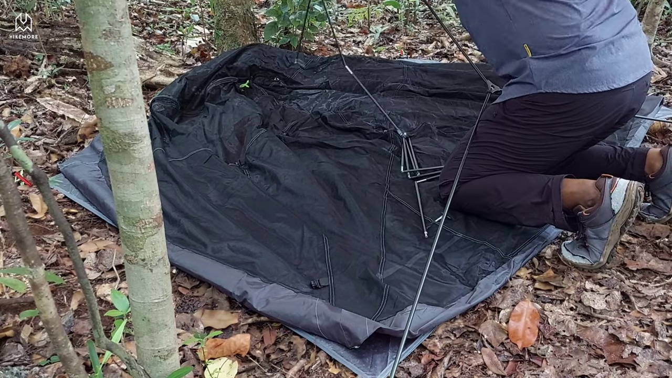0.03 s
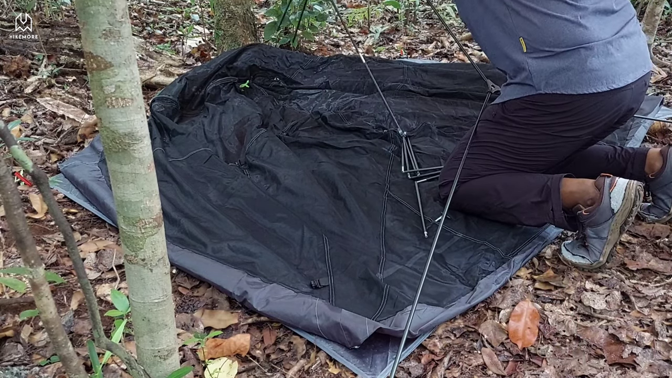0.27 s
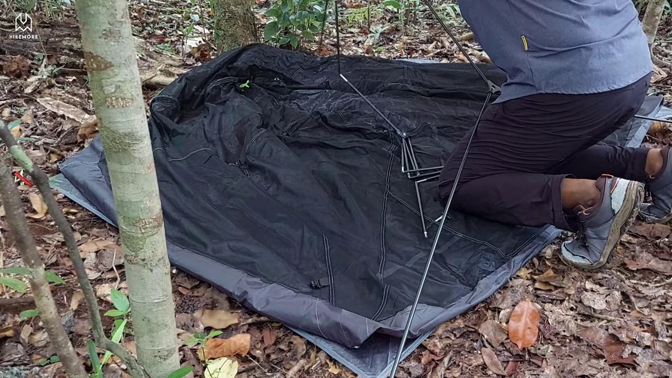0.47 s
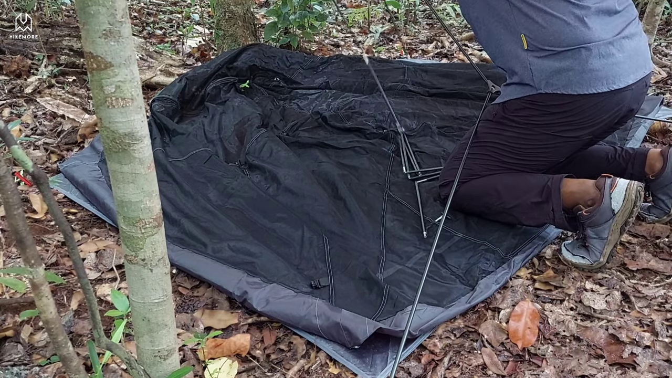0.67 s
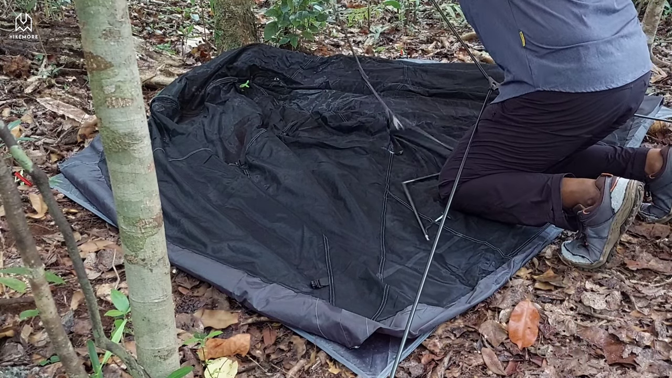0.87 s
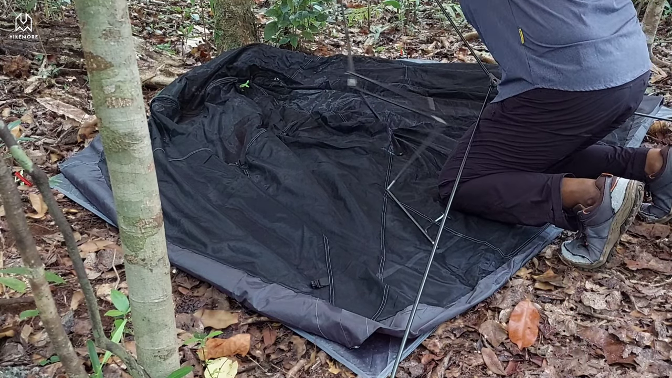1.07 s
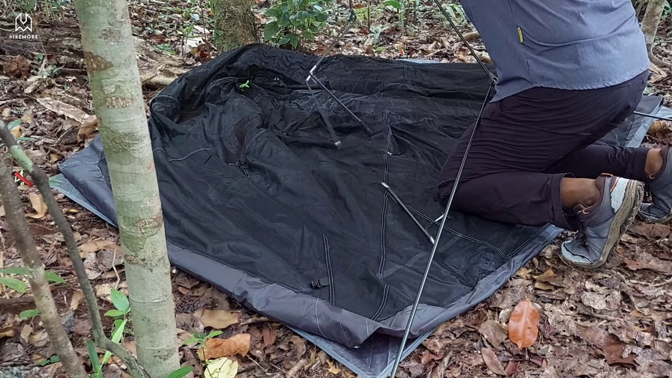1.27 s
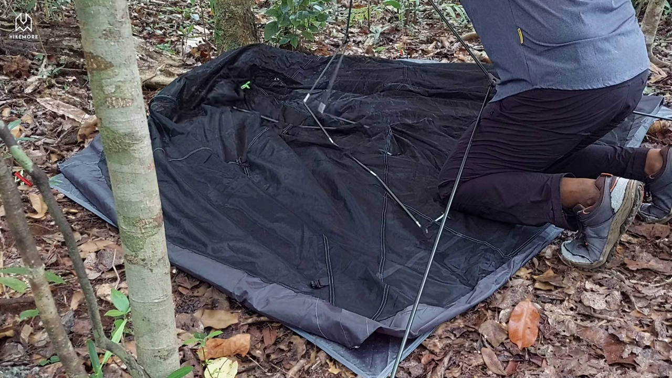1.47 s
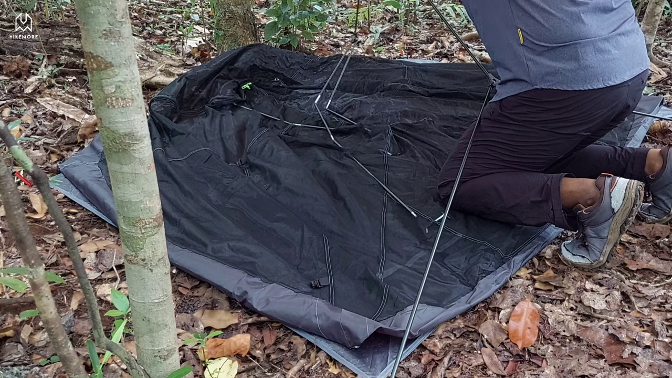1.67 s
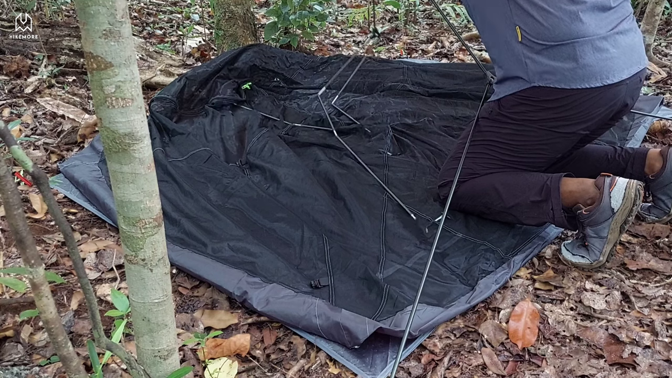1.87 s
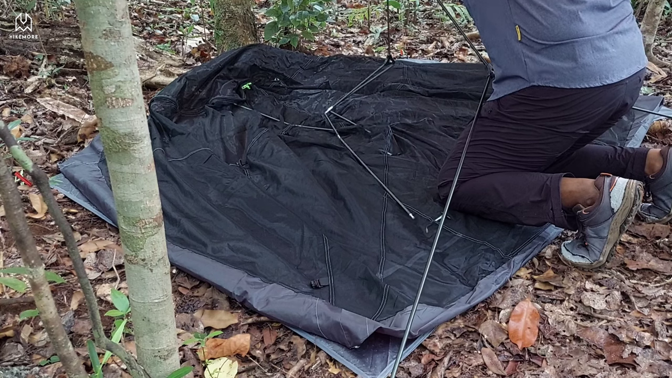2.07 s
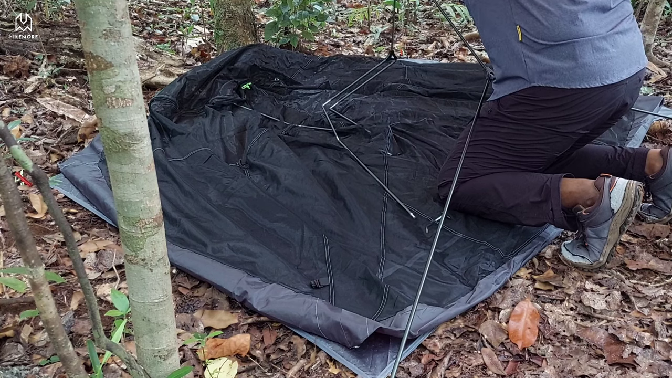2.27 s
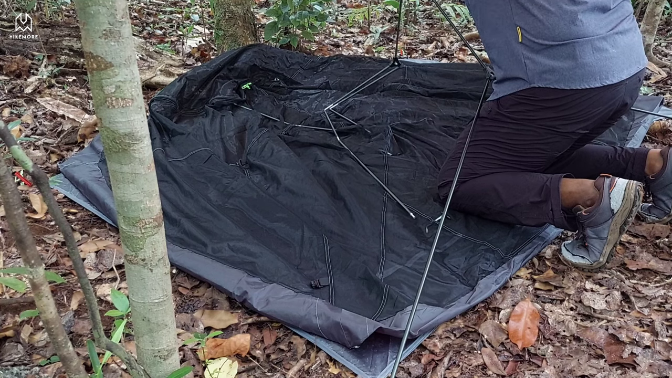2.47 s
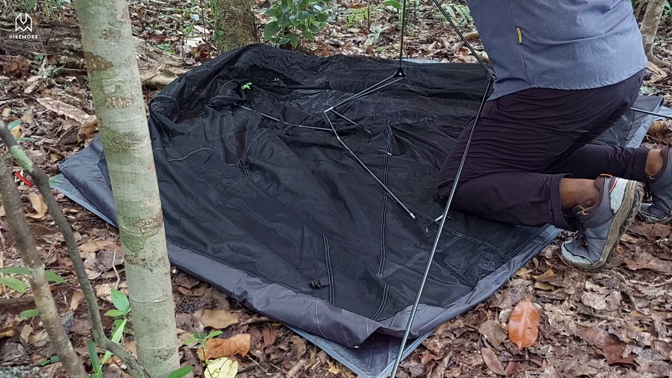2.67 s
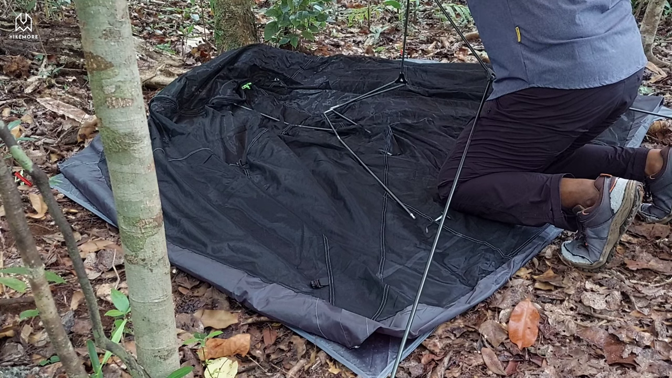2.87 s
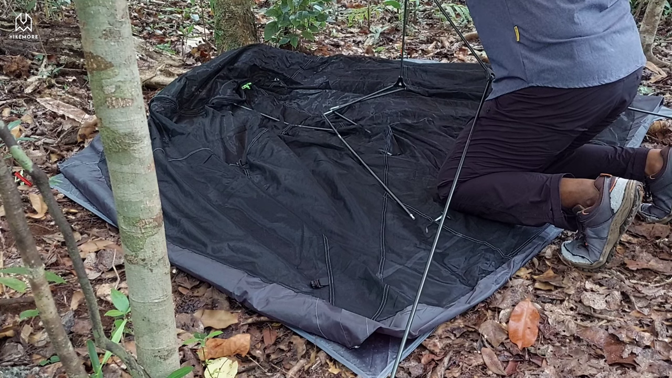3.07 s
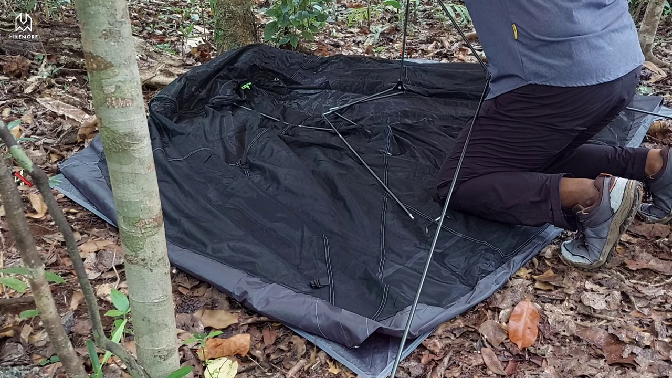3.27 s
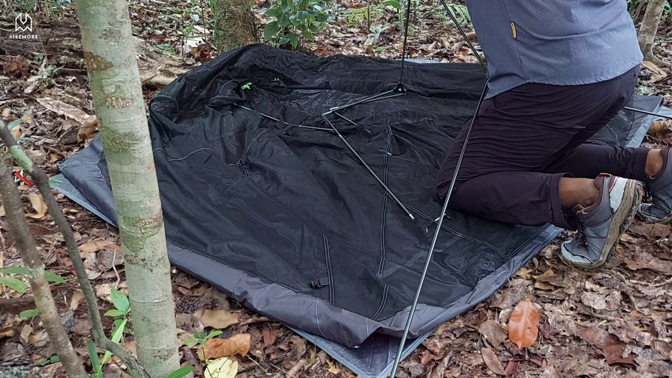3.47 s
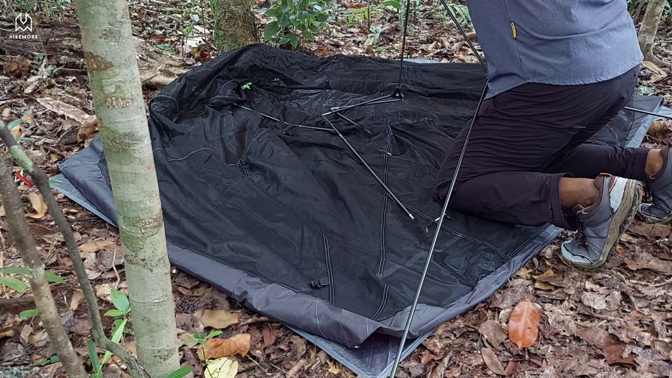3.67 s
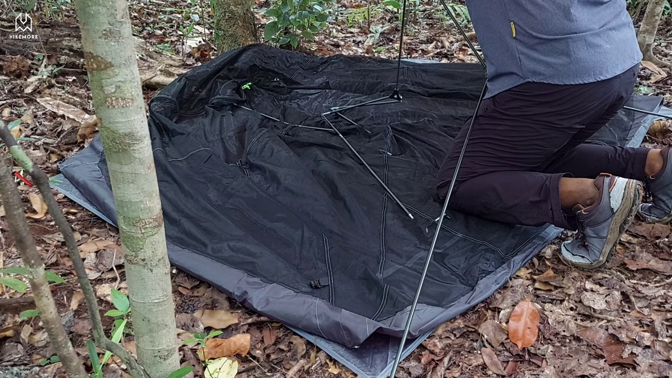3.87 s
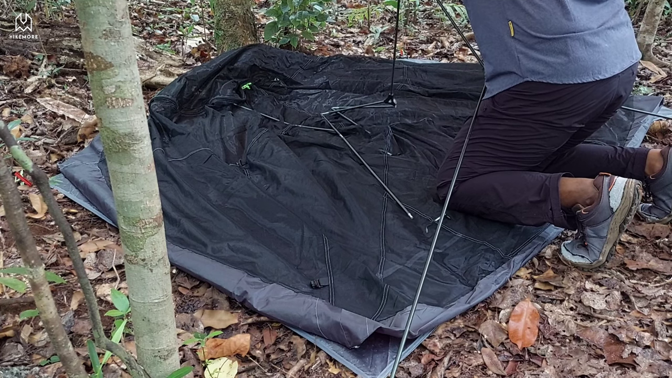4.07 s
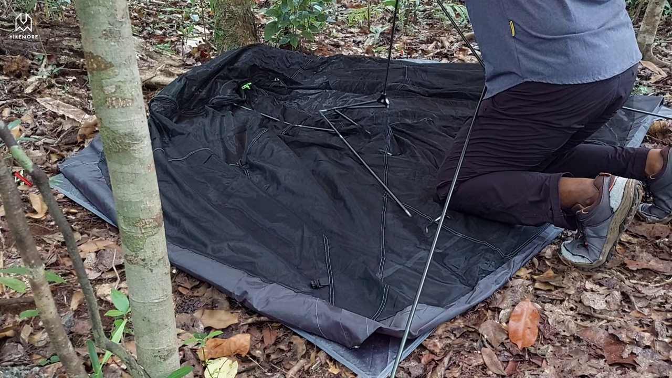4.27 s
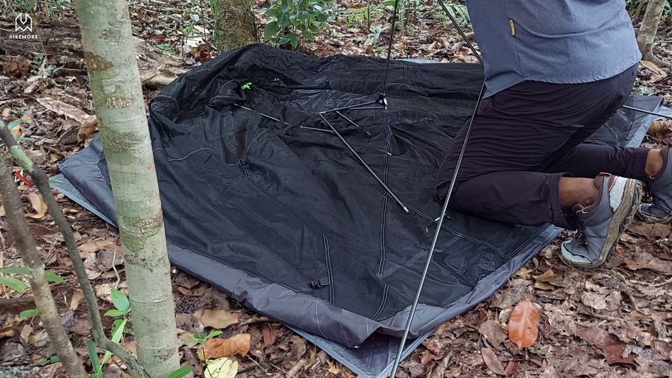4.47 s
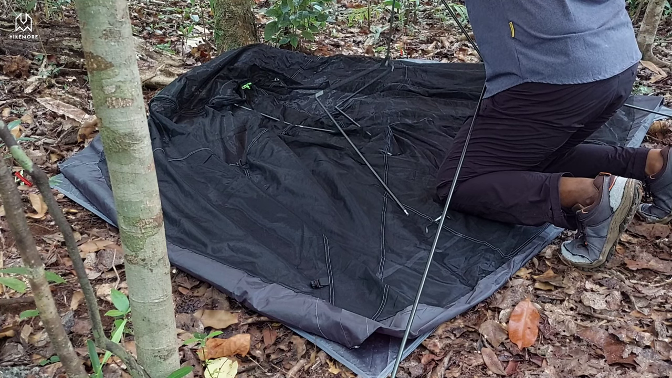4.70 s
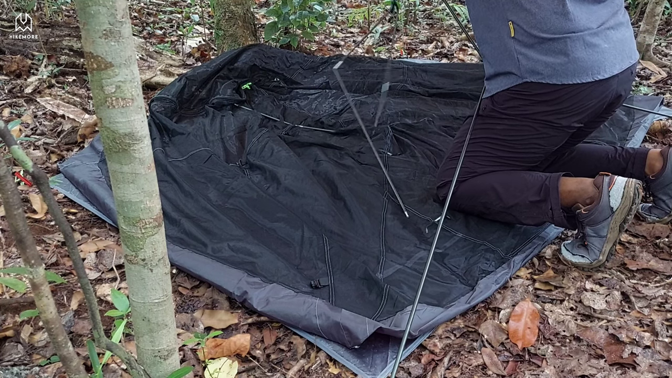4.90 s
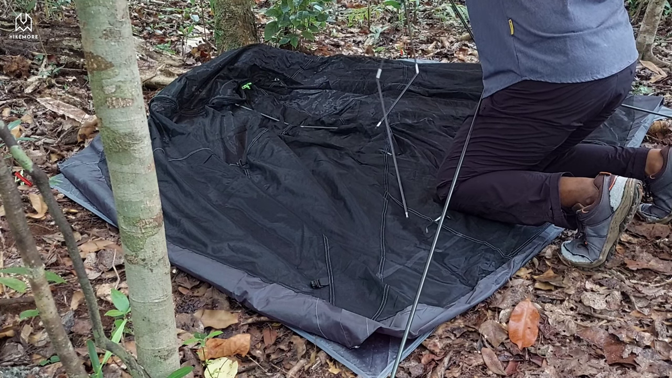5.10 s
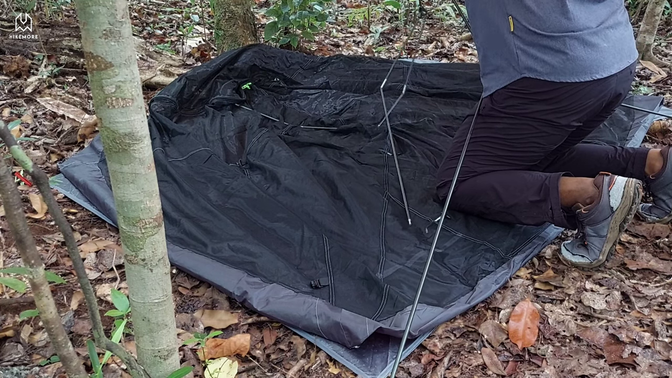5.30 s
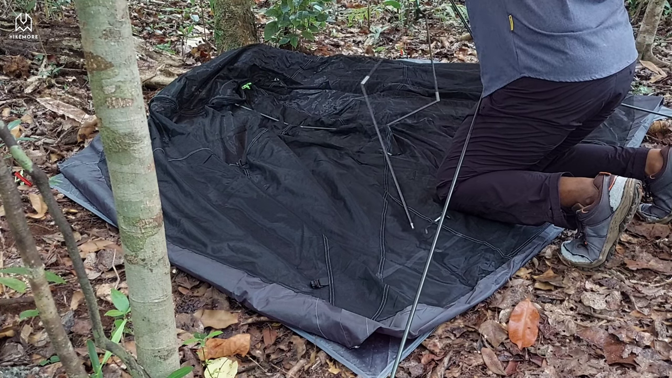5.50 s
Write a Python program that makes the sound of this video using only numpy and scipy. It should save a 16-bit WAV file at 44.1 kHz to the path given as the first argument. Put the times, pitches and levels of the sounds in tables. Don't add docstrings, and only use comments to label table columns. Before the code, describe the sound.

Close, crisp metallic clacks of hollow tubes, dense in the first two seconds and sparser later, over faint leaf hiss and far cricket trills.

```python
import sys
import numpy as np
from scipy import signal
from scipy.fft import rfft, irfft
from scipy.io import wavfile
from scipy.ndimage import uniform_filter1d, map_coordinates

SR = 44100
rng = np.random.default_rng(int(sys.argv[2]) if len(sys.argv) > 2 else 0)


def level_to_linear(level):
    exponent = np.asarray(level, float) / 20
    return 10 ** exponent


def int16_out(signal):
    q = np.round(np.clip(np.atleast_2d(signal).T, -1, 1) * 32767)
    wavfile.write(sys.argv[1], SR, q.astype(np.int16))


N = 244300
TOP_HZ = 15620


def unit(x):
    return x / np.sqrt(np.mean(x ** 2) + 1e-20)


def along(points, hz):
    f, v = np.transpose(points)
    return np.interp(np.log(hz + 1), np.log(f + 1), v)


def wobble(rate_hz):
    knots = rng.standard_normal(int(N * rate_hz / SR) + 4)
    return map_coordinates(knots, [np.arange(N) * rate_hz / SR])


def filtered(x, response):
    n = x.shape[-1]
    return irfft(rfft(x) * response(np.fft.rfftfreq(n, 1 / SR)), n)


def shaped_noise(n, response):
    return unit(filtered(rng.standard_normal(n), response))


def place(out, start_s, sound):
    start = round(start_s * SR)
    out[..., start:start + sound.shape[-1]] += sound


def poles():
    out = blows() + wall_modes() + snaps()
    lag = lambda hz: np.exp(-1j * np.pi * hz * [[1.1], [-1.1]] / SR)
    return filtered(out, lag)[:, :N] * level_to_linear([[-1.7], [1.7]])


# start_s, peak_db, mid_db (re crack), ring_db (re crack), wall_hz (mode singled out)
KNOCKS = [(0.396, -31, -20, -17, 12100), (0.6695, -16, -6.5, -11, 13500), (0.854, -19, -28, -22, 10900),
          (0.8954, -20, -18, -8, 11200), (0.9824, -21.5, -4, -7, 12800), (1.068, -12.5, -8, -12, 10900),
          (1.3063, -15, -8.5, -14.5, 12400), (1.3548, -17.5, -7, -16.5, 12500),
          (1.4102, -28, -25, -11, 13000), (1.6071, -34.5, -22, -33, 10400), (1.7429, -13, -12, -17, 11300),
          (2.043, -30, -4.5, -20, 6700), (2.1333, -27, -7.5, -15, 12100),
          (2.3122, -32.5, -15, -11.5, 12900), (3.1125, -24.5, -34, -15.5, 11400),
          (3.5835, -32.5, -12, -16, 9000), (3.5982, -31, -5, -6, 7520), (4.0271, -27, -28, -13.5, 10640),
          (4.385, -19.5, -8, -9, 11050), (4.6853, -31, -7.5, -13.5, 7820),
          (4.9917, -22, -10.5, -11.5, 13300), (5.1021, -36, -7, -14, 12100), (5.238, -26.5, -31, -8, 10700),
          (5.2598, -15.5, -16, -23, 12000)]
# start_s, peak_db, ring_db (re crack), wall_hz
REBOUNDS = [(0.9946, -26, -2, 12800), (1.006, -26.5, -7, 12100), (1.0695, -20, -23, 14800),
            (1.098, -32, 0, 11000), (1.7451, -15, -17, 11700), (1.7494, -16, -14, 12730),
            (1.7547, -20, -13, 13300), (1.7652, -20, -27, 12600), (2.1384, -28.5, -19, 11900),
            (2.141, -30.5, -8, 14700), (3.1177, -33.5, -14, 12500), (3.612, -44.5, -22, 9700),
            (4.3909, -18.5, -11, 11900), (4.997, -24, -12, 12500)]
# start_s, peak_db, ring_db (re crack), ring_t60_s
TAPS = [(0.0156, -44, -11, 0.14), (0.655, -40.5, -1.5, 0.57), (0.793, -37.5, -12.5, 0.2),
        (0.8401, -36, -7, 0.2), (0.885, -38.5, -4, 0.12), (1.4252, -29, -28, 0.66), (1.504, -48, -6, 0.29),
        (1.5429, -43.5, -10, 0.33), (2.0815, -37.5, -12.5, 0.22), (2.1158, -33, -15, 0.38),
        (2.288, -42.5, -7.5, 0.19), (2.395, -43, -12, 0.25), (2.424, -45.5, -12, 0.13),
        (2.5774, -49, -11, 0.65), (3.1335, -40.5, -8, 0.2), (3.165, -48, -11, 0.18), (3.261, -54, -5, 0.24),
        (3.493, -56, -3, 0.43), (3.5246, -49, -8, 0.25), (3.5408, -47.5, -6.5, 0.4),
        (3.625, -36.5, -20, 0.18), (4.007, -39.5, -13, 0.2), (4.0604, -42, -12, 0.27),
        (4.3202, -45.5, -12, 0.8), (4.374, -46, 2, 0.44), (4.4629, -32, -7, 0.14), (4.489, -47, -21, 0.24),
        (4.6617, -50, -10, 0.25), (4.7402, -43, -17, 0.91)]
BLOW_N = 16384
RING_REF_DB = -13.5


def ring_t60_s(peak_db, ring_db):
    return 0.19 * level_to_linear(0.19 * (peak_db + 19) - 0.3253 * (ring_db - RING_REF_DB))


def contacts():
    rows = []
    for start_s, peak_db, mid_db, ring_db, wall_hz in KNOCKS:
        ring_mid_db = -9 - 0.2751 * (peak_db + 22)
        rows.append((start_s, peak_db, mid_db, ring_db, ring_t60_s(peak_db, ring_db), ring_mid_db))
    for start_s, peak_db, ring_db, wall_hz in REBOUNDS:
        rows.append((start_s, peak_db, -12.5, ring_db, ring_t60_s(peak_db, ring_db), -20))
    for start_s, peak_db, ring_db, t60_s in TAPS:
        rows.append((start_s, peak_db, -5.5, ring_db, t60_s, -3))
    return rows


def blows():
    out, t = np.zeros((2, N + SR)), np.arange(BLOW_N) / SR
    for start_s, peak_db, mid_db, ring_db, t60_s, ring_mid_db in contacts():
        crack = tube_noise(mid_db + 3.24, peaky_db=5.0, alike=0.66)
        crack = crack * level_to_linear(-60 * t / 0.011) * (t / 0.0016) ** 2 / (1 + (t / 0.0013) ** 2)
        ring = tube_noise(ring_mid_db, peaky_db=2.5, alike=0.32) * chatter(t, depth_db=1.0)
        ring = filtered(ring, lambda hz: hz < TOP_HZ)
        ring = ring * level_to_linear(ring_db - 60 * t / max(t60_s, 0.03)) * (1 - np.exp(-t / 0.0013))
        low_hz = 700 * level_to_linear(-0.35 * (peak_db + 12.0))
        blow = filtered(3.69 * crack + 1.324 * ring, lambda hz: 1j * hz / (1j * hz + low_hz))
        place(out, start_s, level_to_linear(peak_db - 7.0) * blow)
    return out


def singled_modes():
    wall_t60_s, bending_ratio, bending_t60_s = 0.056, 2.76, 0.097
    modes = []
    for start_s, peak_db, mid_db, ring_db, wall_hz in KNOCKS:
        wall_db = peak_db - 2.5 + 0.5 * (ring_db - RING_REF_DB)
        modes.append((start_s + 0.001, wall_db, wall_hz, wall_t60_s))
        modes.append((start_s, peak_db + mid_db - 10.5, wall_hz / bending_ratio, bending_t60_s))
    for start_s, peak_db, ring_db, wall_hz in REBOUNDS:
        modes.append((start_s, peak_db + 7, wall_hz, wall_t60_s))
    return modes


def wall_modes():
    out, t = np.zeros((2, N + SR)), np.arange(BLOW_N) / SR
    for start_s, level_db, mode_hz, t60_s in singled_modes():
        a, b = rng.standard_normal((2, BLOW_N))
        pair = np.array([a, 0.6 * a + 0.8 * b])
        mode = unit(filtered(pair, lambda f: 1 / (1 + ((f - mode_hz) / (0.057 * mode_hz)) ** 4)))
        envelope = level_to_linear(level_db - 12.5 - 60 * t / t60_s) * (1 - np.exp(-t / 0.00082))
        place(out, start_s, envelope * mode * chatter(t, depth_db=6.5))
    return out


def snaps():
    delay_s, low_hz, t60_s = 0.0013, 1460, 0.0041
    out, t = np.zeros((2, N + SR)), np.arange(BLOW_N) / SR
    for start_s, peak_db, mid_db, ring_db, wall_hz in KNOCKS:
        level_db = peak_db - 7.5 - 0.36 * (ring_db - RING_REF_DB)
        snap = level_to_linear(level_db - 60 * t / t60_s) * tube_noise(mid_db - 4.5, peaky_db=2.0, alike=1.0)
        place(out, start_s + delay_s, filtered(snap, lambda f: (1j * f / (1j * f + low_hz)) ** 2))
    return out


# freq_hz, density_db (per Hz)
WALL_SPECTRUM = [(3820, -26.5), (6500, -17.5), (7480, -7), (8120, -11.5), (10000, -5), (11400, -4),
                 (12800, -5), (15600, -9), (16100, -44), (16500, -69)]
# freq_hz, density_db (per Hz)
BENDING_SPECTRUM = [(530, -39), (900, -32), (1460, -19.5), (1570, -20.5), (1710, -8), (2300, -8),
                    (3020, -6.5), (3310, -2), (3570, -7), (3860, -1), (6800, -3.5), (8840, -25.5),
                    (15000, -120)]


def tube_noise(mid_db, peaky_db, alike):
    a, b = rng.standard_normal((2, BLOW_N))
    pair = np.array([a, alike * a + np.sqrt(1 - alike ** 2) * b])
    peaks = uniform_filter1d(rng.standard_normal(BLOW_N // 2 + 1), size=45)
    modes = level_to_linear(peaky_db * unit(peaks))
    wall = unit(filtered(pair, lambda hz: modes * level_to_linear(along(WALL_SPECTRUM, hz))))
    bending = unit(filtered(pair, lambda hz: modes * level_to_linear(along(BENDING_SPECTRUM, hz))))
    return wall + level_to_linear(mid_db) * bending


def chatter(t, depth_db):
    touch = np.clip(rng.standard_normal(700), -3, 1.5)
    return unit(level_to_linear(depth_db * np.interp(t * 1500, np.arange(700), touch)))


# freq_hz, density_db (per Hz)
NYLON_SPECTRUM = [(80, -33), (200, 0), (400, -2.5), (900, -3), (1700, -6), (2600, -10.5), (5000, -15),
                  (9000, -64)]


def nylon(n):
    return shaped_noise(n, lambda f: level_to_linear(along(NYLON_SPECTRUM, f)))


# start_s, peak_db, pitch_hz, t60_s, puff_db (re drum)
THUDS = [
    (0.674, -41.5, 349, 0.17, -3.5),
    (1.074, -55.5, 586, 0.063, -3),
    (1.35, -64.5, 400, 0.49, 15.5),
    (1.41, -55, 248, 0.076, -2),
    (1.504, -51.5, 662, 0.075, 1),
    (1.567, -47, 258, 0.077, -0.5),
    (1.749, -42.5, 264, 0.16, -1),
    (4.384, -44.5, 570, 0.096, -10),
    (4.465, -57, 245, 0.14, 6),
    (4.993, -60.5, 260, 0.13, 6.5),
]


def sheet_thuds():
    out, t = np.zeros(N + SR), np.arange(SR // 4) / SR
    for start_s, peak_db, pitch_hz, t60_s, puff_db in THUDS:
        drum = shaped_noise(len(t), lambda f: np.exp(-((f - pitch_hz) / 45) ** 2))
        envelope = level_to_linear(peak_db - 10.5 - 60 * t / t60_s) * (1 - np.exp(-t / 0.00037))
        place(out, start_s, envelope * (drum + level_to_linear(puff_db) * nylon(len(t))))
    return out[:N]


# start_s, length_s, level_db
DRAGS = [
    (1.497, 0.05, -57),
    (1.564, 0.0097, -56.5),
]


def sheet_drag():
    attack_s, t60_s = 0.0043, 0.078
    s, gain = np.arange(N) / SR, np.zeros(N)
    for start_s, length_s, level_db in DRAGS:
        decay = level_to_linear(level_db - 60 * np.maximum(s - start_s - length_s, 0) / t60_s)
        gain += decay * np.clip((s - start_s) / attack_s, 0, 1)
    return level_to_linear(1.4 * wobble(300)) * gain * nylon(N)


# freq_hz, t60_s
TRUNK_DECAY = [(500, 0.18), (3000, 0.41), (15000, 0.32)]


def trunks(x):
    hz, t, z = signal.stft(rng.standard_normal((2, SR // 2)), SR, nperseg=256)
    decay = level_to_linear(-60 * t / along(TRUNK_DECAY, hz)[:, None])
    tail = signal.istft(z * decay, SR, nperseg=256)[1]
    late = np.pad(x, (400, 0))[None]
    return signal.fftconvolve(late, tail / np.linalg.norm(tail[0]), axes=1)[:, :N]


# pitch_hz, width_hz, pulse_rate_hz, level_db, pan_db (left minus right)
CRICKETS = [
    (5474, 185, 37, 6.5, -1),
    (5580, 190, 29, -3, -2),
    (5300, 190, 54, -6, -1),
]


def crickets():
    song = 0
    for pitch_hz, width_hz, pulse_rate_hz, level_db, pan_db in CRICKETS:
        band = unit(filtered(rng.standard_normal((2, N)), lambda f: np.exp(-((f - pitch_hz) / width_hz) ** 2)))
        rate_hz = pulse_rate_hz * (1 + 0.0327 * wobble(3.08))
        stroke = 1 + 0.51 * np.sin(2 * np.pi * np.cumsum(rate_hz) / SR)
        gain_db = level_db + 1.3 * wobble(0.88) + pan_db / 2 * np.array([[1], [-1]])
        song = song + level_to_linear(gain_db) * stroke * band
    s = np.arange(N) / SR
    full_db, start_db, join_s, swell_db_per_s = -71.5, -12, 0.18, 0.93
    song_db = full_db + start_db * np.exp(-s / join_s) + swell_db_per_s * s
    return level_to_linear(song_db + 0.5) * unit(song)


# time_s, hiss_db
STIR = [
    (0.0, -68),
    (0.43, -71.5),
    (0.86, -65.5),
    (1.29, -69),
    (2.2, -71),
    (2.82, -73),
    (5.54, -73),
]
# freq_hz, density_db (per Hz)
HISS_SPECTRUM = [(290, -58), (500, -10), (1310, -12), (2290, -10), (3500, -12), (4900, -7.5), (5510, -3),
                 (6660, -13.5), (8670, -15.5), (11000, -13), (14900, -19), (15800, -15), (16500, -66)]
# freq_hz, density_db (per Hz)
RUMBLE_SPECTRUM = [(12, -66), (20, -26), (54, -2), (129, -1), (166, -9.5), (205, -7), (277, -5.5),
                   (507, -12.5), (900, -21.5), (1170, -61), (1980, -120)]


def air():
    time_s, level_db = np.transpose(STIR)
    hiss_db = np.interp(np.arange(N) / SR, time_s, level_db)
    rumble_db = -72.5 + 0.35 * (hiss_db - hiss_db.mean())
    lumps = level_to_linear(0.37 * np.array([wobble(7.7), wobble(11)]))
    rumble = level_to_linear(rumble_db + 1.5) * lumps * rush(RUMBLE_SPECTRUM, patchy_db=1.6)
    return rumble + level_to_linear(hiss_db + 3.0) * rush(HISS_SPECTRUM, patchy_db=2.5)


# freq_hz, difference_db
LEAN = [(60, 13), (180, 6), (550, 2.5), (1650, -0.5), (4970, -5.5), (15000, -5.5)]
# freq_hz, correlation [-1..1]
ALIKE = [(60, 0.1), (180, 0.24), (550, 0.38), (1650, -0.034), (4970, -0.19), (15000, 0.15)]


def rush(spectrum, patchy_db):
    z = signal.stft(rng.standard_normal((2, N + 600)), nperseg=512)[2]
    field = uniform_filter1d(rng.standard_normal(z.shape[1:]), 6, 0)
    field = uniform_filter1d(field, 14, 1)
    pair = signal.istft(z * level_to_linear(patchy_db * unit(field)), nperseg=512)[1][:, :N]
    turn = lambda hz: np.arccos(np.clip(along(ALIKE, hz), -1, 1)) / 2
    split = lambda hz: level_to_linear(along(spectrum, hz)) * [np.cos(turn(hz)), np.sin(turn(hz))]
    mid, side = filtered(pair, split)
    lean = lambda hz: level_to_linear(along(LEAN, hz) / 2 * [[1], [-1]])
    both = filtered(np.array([mid + side, mid - side]), lean)
    return both / np.sqrt(np.mean(both.mean(axis=0) ** 2))


def scene():
    near = poles() + sheet_thuds() + sheet_drag()
    far = level_to_linear(-8.5) * trunks(near.mean(axis=0)) + crickets() + air()
    return near + filtered(far, lambda hz: hz < TOP_HZ)


def band_limit(x):
    return signal.sosfilt(signal.butter(12, 16810, fs=SR, output="sos"), x)


def record(dry):
    return band_limit(dry)


dry = scene()
out = record(dry)
int16_out(out)
```